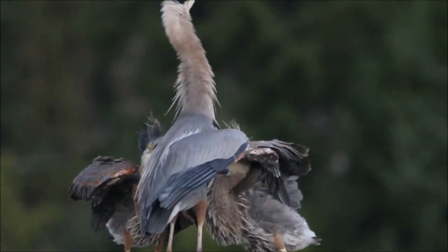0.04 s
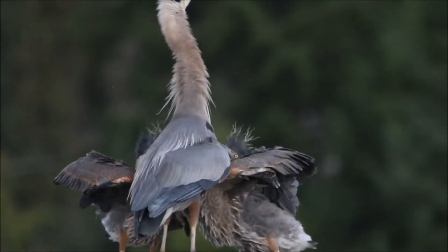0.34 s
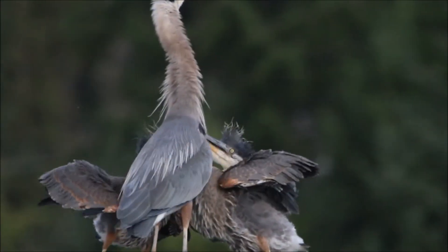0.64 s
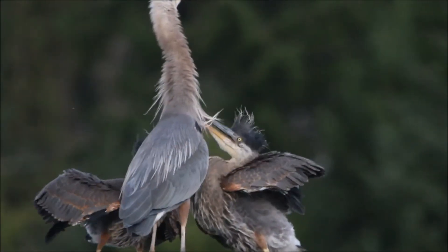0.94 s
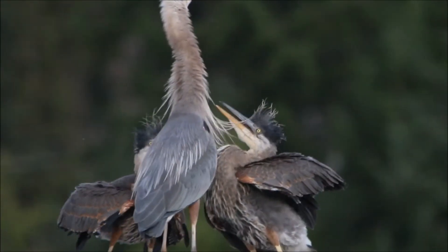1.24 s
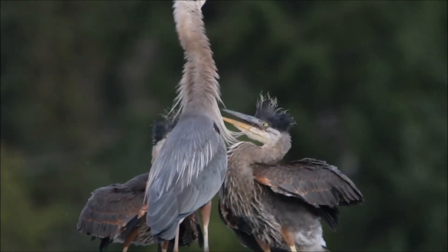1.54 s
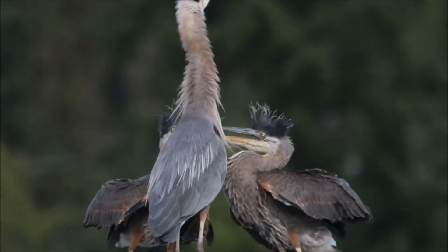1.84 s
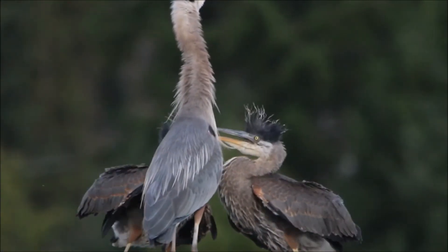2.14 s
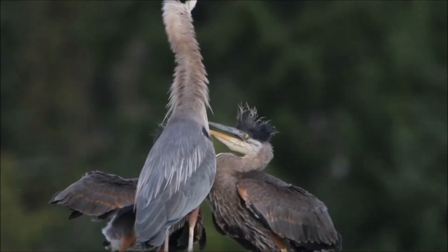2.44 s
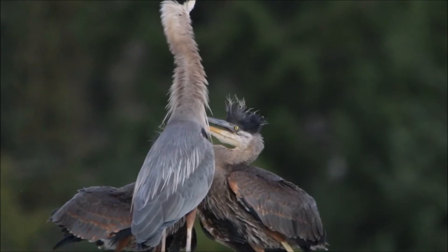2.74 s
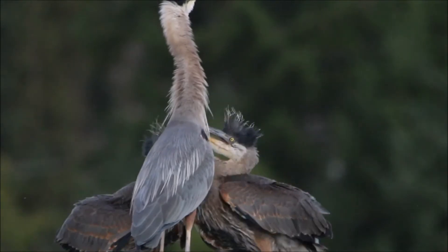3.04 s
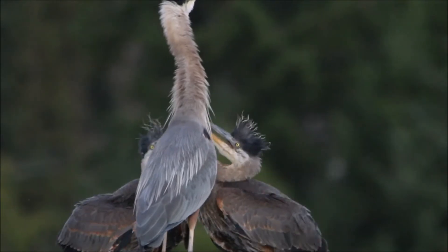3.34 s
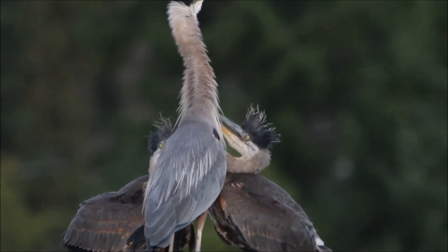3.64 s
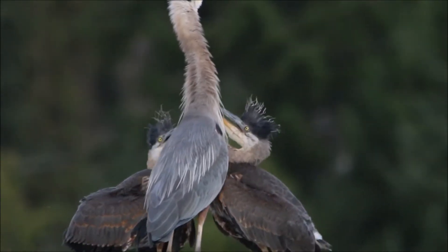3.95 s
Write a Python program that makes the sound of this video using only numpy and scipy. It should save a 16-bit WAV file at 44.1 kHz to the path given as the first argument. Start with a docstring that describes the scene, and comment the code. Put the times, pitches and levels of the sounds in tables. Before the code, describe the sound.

Heron chicks beg with short, hoarse clacks over a low rumble of wind and traffic.

```python
"""A heron nest below a wooded slope, some way off: two chicks beg in turn with short, hoarse clacks,
up to about three a second each. Every clack is a rattle of uneven pulses ringing the throat, mouth
and bill; the slope answers with echoes. Wind and far traffic rumble underneath with a faint engine
hum, and the recorder adds hiss and a thin whine."""
import sys
import numpy as np
from scipy import signal
from scipy.fft import rfft, irfft
from scipy.io import wavfile

SR = 44100
rng = np.random.default_rng(int(sys.argv[2]) if len(sys.argv) > 2 else 0)


def persist_wave(psi):
    """Save psi, clipped to +-1, as 16-bit WAV."""
    counts = np.round(np.clip(psi, -1, 1) * 32767).astype(np.int16)
    wavfile.write(sys.argv[1], SR, np.atleast_2d(counts).T)


N = 176400

# Stereo image of wind and traffic, near mono in the lows: (frequency [Hz], left-right likeness [0-1])
RUMBLE_LIKENESS = [(30, 0.978), (120, 1), (250, 0.91), (600, 0.87), (1000, 0.687), (2000, 0.15), (4000, .1)]


def amp(db):
    """Decibels to gain."""
    return 10 ** (np.asarray(db) / 20)


def unit_rms(x):
    """Scales to rms 1."""
    return x / np.sqrt(np.mean(x ** 2) + 1e-20)


def curve_at(points, hz):
    """Reads a table on a log-frequency axis."""
    f, value = np.transpose(points)
    return np.interp(np.log(hz + 1), np.log(f + 1), value)


def add(mix, start, sound):
    """Mixes a sound in, start seconds along."""
    part = mix[max(round(start * SR), 0):][:len(sound)]
    part += sound[:len(part)]


def drift(rate_hz):
    """A slow random wander, rms 1."""
    hz = np.fft.rfftfreq(N, 1 / SR)
    return unit_rms(irfft(rfft(rng.standard_normal(N)) * np.exp(-(hz / rate_hz) ** 2) * (hz > 0), N))


def stereo(x, colour, likeness):
    """Equalises two unrelated signals and blends them as mid and side."""
    hz = np.fft.rfftfreq(x.shape[1], 1 / SR)
    mid, side = rfft(x) * amp(curve_at(colour, hz))
    same = np.clip(curve_at(likeness, hz), -1, 1)
    mid, side = mid * np.sqrt((1 + same) / 2), side * np.sqrt((1 - same) / 2)
    return irfft(np.array([mid + side, mid - side]), x.shape[1])


def noise_bed(colour, likeness):
    """Coloured stereo noise, rms 1."""
    return unit_rms(stereo(rng.standard_normal((2, N)), colour, likeness))


def rumble(level_db=-42, swell_db=0.9755):
    """Wind and far traffic: a low bed of noise that gently swells and sinks."""
    # Rumble spectrum: (frequency [Hz], relative level [dB])
    colour = [(10, -21.5), (30, -1.5), (55, -1.5), (110, 0), (150, -5.5), (200, -10), (300, -12),
              (500, -13), (720, -12.5), (950, -22.5), (1300, -25.5), (1700, -28.5), (2500, -39),
              (5000, -69.5)]
    return noise_bed(colour, RUMBLE_LIKENESS) * amp(level_db + swell_db * drift(3))


def gust():
    """Deep wind eases off, then comes back in one long gust."""
    # Wind spectrum: (frequency [Hz], relative level [dB])
    colour = [(10, -12), (32, -3), (60, -8), (90, -13.5), (200, -44), (1000, -80.5)]
    # Wind strength: (time [s], level [dB])
    fader = [(0, -46), (1.4, -57), (2.1, -47), (2.7, -49), (3.3, -47.5), (4, -54)]
    return noise_bed(colour, RUMBLE_LIKENESS) * amp(np.interp(np.arange(N) / SR, *np.transpose(fader)))


def engine_hum(hz=233.9, wander_hz=2.522, flutter_db=1.87):
    """A far engine: one tone wavering in pitch and level."""
    # Hum strength before the flutter: (time [s], level [dB])
    fader = [(0, -59), (.35, -52), (1.101, -53.5), (1.7, -60.5), (2.3, -52.5), (3.2, -62.5), (4, -58.5)]
    tone = unit_rms(np.sin(2 * np.pi * np.cumsum(hz + wander_hz * drift(8.93)) / SR))
    level_db = np.interp(np.arange(N) / SR, *np.transpose(fader))
    return tone * amp(level_db + flutter_db * drift(6))


def hiss(level_db=-62, lean_db=0.28):
    """The recorder's own noise, wide and a touch to the right."""
    # Hiss spectrum: (frequency [Hz], relative level [dB])
    colour = [(200, -12), (2000, 1), (3200, -0.5), (5000, -3.5), (7000, -7), (9000, -12), (10200, -16.5),
              (11000, -22), (11700, -37)]
    return noise_bed(colour, [(100, 0), (10000, 0)]) * amp([[level_db - lean_db], [level_db + lean_db]])


def whine(hz=9771, left_db=-84, right_db=-78.5):
    """The recorder's thin, steady tone."""
    return amp([[left_db], [right_db]]) * unit_rms(np.sin(2 * np.pi * hz * np.arange(N) / SR))


def rattle(length, release, pulses_per_s=150, jitter=.3, air=0.0807, puff_s=0.00273):
    """Uneven pulses, each trailing a puff of air, under one short swell."""
    spread_db, first_db, swell_db = 1.5, 2.5, 4
    t = np.arange(SR // 8) / SR
    timing, strengths = rng.standard_normal((2, 40))
    gaps = np.exp(jitter * timing) / pulses_per_s
    onsets = np.cumsum(gaps) - gaps[0]
    inside = onsets < t[-1]
    pulses = np.zeros(len(t))
    pulses[(onsets[inside] * SR).astype(int)] = amp(spread_db * strengths[inside])
    pulses[0] = amp(first_db)  # a firm attack
    puffs = signal.lfilter([1], [1, -np.exp(-1 / (puff_s * SR))], pulses) * rng.standard_normal(len(t))
    swell = amp(swell_db * np.sin(np.pi * np.minimum(t / length, 1)))
    fade = np.exp(-np.maximum(t - length, 0) / release)
    return (pulses + air * puffs) * swell * fade


def resonate(x, hz, width):
    """A steep resonance: two equal stages, gain 1."""
    carrier = np.exp(2j * np.pi * hz * np.arange(len(x)) / SR)
    r = np.exp(-np.pi * width / SR)
    return 2 * (carrier * signal.lfilter([(1 - r) ** 2], [1, -2 * r, r * r], x / carrier)).real


def clack(voice, length, main_hz, *levels_db, release=0.0086, detune=.008):
    """One rattle rings throat, mouth and bill, as many of them as are given a level."""
    # Gaps between the resonances: (frequency [Hz], width [Hz])
    notches = [(1325, 107.2), (3040, 240)]
    main_width, throat, mouth, bill = voice
    throat = [(main_hz, main_width, 0)] + throat
    drive, out = rattle(length, release), 0
    for modes, db in zip((throat, mouth, bill), levels_db):
        ring = 0
        for k, (hz, width, mode_db) in enumerate(sorted(modes)):
            tuned_hz = hz * (1 + detune * rng.standard_normal())
            ring += (-1) ** k * amp(mode_db) * resonate(drive, tuned_hz, width)
        out += amp(db) * ring * np.sqrt(length * SR / np.sum(ring ** 2))
    for hz, width in notches:
        out = signal.lfilter(*signal.iirnotch(hz, hz / width, SR), out)
    return out


def raspy_chick():
    """The first chick begs with more bill in its clacks, which gives them a rasp."""
    # Main throat resonance width [Hz], then throat, mouth, bill: (frequency [Hz], width [Hz], gain [dB])
    voice = (165.8, [(1077.8, 224, -4.5), (661.3, 160, 0.5)], [(1466, 279, -3.5), (1679.3, 188, -0.33),
             (1899.3, 257, -0.55)], [(2406.5, 209, 9.5), (2757, 200, 1), (3396, 420, 1),
             (4460, 500, -19.5)])
    # Calls: (time [s], length [s], main resonance [Hz], throat [dB], mouth [dB], bill [dB])
    calls = [ (.067, 0.0497, 970, -41, -47, -55.5), (.803, 0.0533, 894, -38, -54, -56.5),
             (1.151, 0.0482, 877.5, -35, -52.5, -59), (1.553, 0.0586, 820, -39, -50, -56),
             (2.290, 0.0306, 848, -37, -48.5, -65), (2.575, 0.0563, 817, -36, -48.5, -61),
             (2.948, 0.0351, 850, -32.5, -49, -59.5), (3.336, 0.0483, 836, -39.5, -54, -60),
             (3.739, 0.0447, 850, -38, -49.5, -58)]
    out = np.zeros(N)
    for start, *call in calls:
        add(out, start, clack(voice, *call))
    return out


def hollow_chick(catch_lead_s=.019, catch_length_s=0.00775):
    """The second chick rings hollow in the mouth and catches softly just before each clack."""
    # Main throat resonance width [Hz], then throat, mouth, bill: (frequency [Hz], width [Hz], gain [dB])
    voice = (176.7, [(797.3, 183, -7), (656.4, 161.7, -6)], [(1500.4, 196.4, 12.5), (1722.4, 256, -0.5),
             (1919, 173, 0)], [(2370, 150, -1.5), (2704, 170, -6), (3317, 260, -9.5)])
    # Calls: (time [s], length [s], main resonance [Hz], throat [dB], mouth [dB], bill [dB])
    calls = [ (0.455, 0.021, 863, -39.5, -46.5, -65.5), (0.639, 0.0131, 910, -45, -53, -72),
             (0.997, 0.0254, 973, -40.5, -46, -78.5), (1.384, 0.0397, 950, -35.5, -42.5, -65.5),
             (1.751, 0.0397, 967.3, -33, -41, -63), (2.126, 0.0469, 985, -31.5, -37, -69),
             (2.481, 0.044, 975, -32, -36.5, -62), (2.852, 0.0529, 989, -33, -40, -57.5),
             (3.213, 0.0504, 993, -35.5, -41.5, -65.5), (3.599, 0.0434, 924, -35.5, -43, -75.5),
             (3.959, 0.0337, 1007, -34.5, -40, -70)]
    out = np.zeros(N)
    for start, length, hz, throat_db, mouth_db, bill_db in calls:
        add(out, start, clack(voice, length, hz, throat_db, mouth_db, bill_db))
        catch = clack(voice, catch_length_s, hz, throat_db - 9, mouth_db - 5, release=0.0039)
        add(out, start - catch_lead_s, catch)
    return out


def echo_pattern(near_db=-6, near_t60_s=0.212, far_db=-9, build_s=0.0536, reflections_per_s=2000):
    """Scatter from nearby branches, a few distinct echoes and the long tail of the trees."""
    # Tail of the trees: (frequency [Hz], time to fall 60 dB [s])
    decay = [(400, 0.03), (700, 1.26), (1000, 0.67), (1700, 0.57), (2600, 0.1564), (4500, 0.82)]
    # Distinct echoes off the slope: (delay [s], level before colouring [dB])
    echoes = [(.021, -16), (.034, -20), (.049, -12.5), (0.079, -15.5), (.148, -21.5), (.172, -23.5),
              (.195, -24.5)]
    # Tone of all reflections: (frequency [Hz], gain [dB])
    colour = [(400, 2.5), (700, 0.5), (1000, 0), (1600, 5), (2600, 7.5), (4500, -1.5)]
    # Their stereo image, wider in the highs: (frequency [Hz], left-right likeness [0-1])
    likeness = [(500, 1), (1000, 0.557), (1700, 0.296), (2600, 0.11), (4500, .1)]
    t = np.arange(SR) / SR
    far, near = rng.standard_normal((2, 2, SR)) * (rng.random((2, 2, SR)) < reflections_per_s / SR)
    hz, when, bands = signal.stft(far * np.minimum(t / build_s, 1), SR, nperseg=256)
    bands *= amp(-60 * when / curve_at(decay, hz)[:, None])
    far = signal.istft(bands, SR, nperseg=256)[1][:, :SR]
    near *= amp(-60 * t / near_t60_s)
    tail = (amp(far_db) * unit_rms(far) + amp(near_db) * unit_rms(near)) / np.sqrt(SR)
    for delay, db in echoes:
        tail[0, round(delay * SR * rng.uniform(.97, 1.03))] += amp(db)  # mid only, so centred
    return stereo(tail, colour, likeness)


def woods(birds, patterns=5, pattern_cycle_s=1.3):
    """The echoes vary from call to call: the calls crossfade round a set of patterns."""
    cycle = np.arange(N) / SR / pattern_cycle_s
    sends = np.maximum(np.cos(2 * np.pi * (cycle - np.arange(patterns)[:, None] / patterns)), 0) ** 2
    sends /= np.linalg.norm(sends, axis=0)  # constant power
    return sum(signal.fftconvolve((birds * send)[None], echo_pattern(), axes=1)[:, :N] for send in sends)


def scene():
    """Chicks straight ahead, the woods around them, rumble below."""
    birds = hollow_chick() + raspy_chick()
    return birds + woods(birds) + rumble() + gust() + engine_hum()


def record(dry):
    """The recorder adds hiss and whine, then cuts the top end steeply."""
    cutoff_hz = 11700
    lowpass = signal.firwin(511, cutoff_hz, window=("kaiser", 9), fs=SR)
    return signal.oaconvolve(dry + hiss() + whine(), lowpass[None], "same")


dry = scene()
out = record(dry)
persist_wave(out)
```